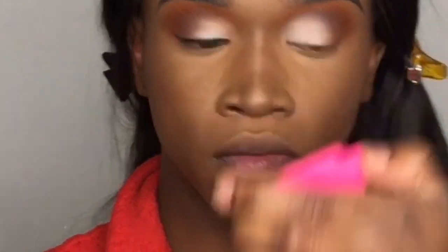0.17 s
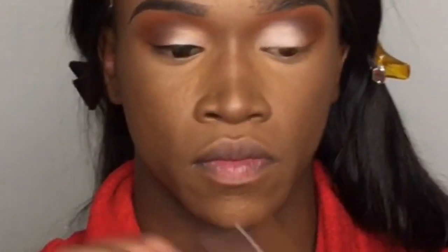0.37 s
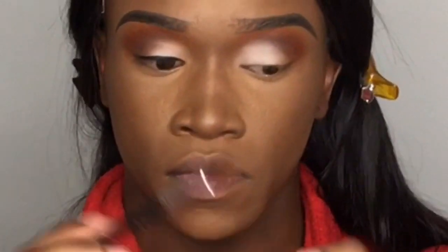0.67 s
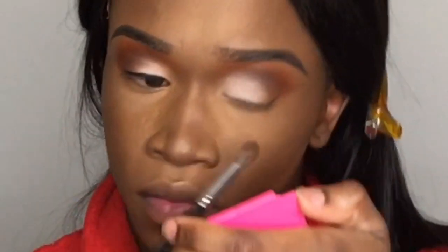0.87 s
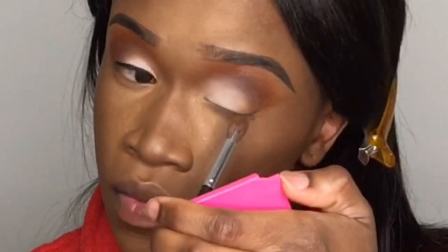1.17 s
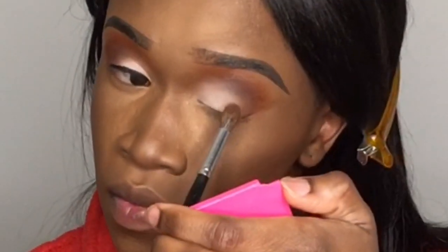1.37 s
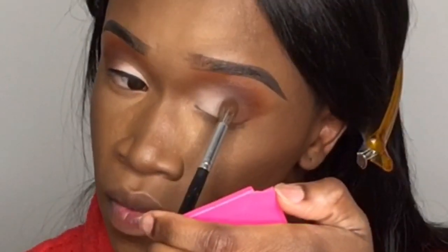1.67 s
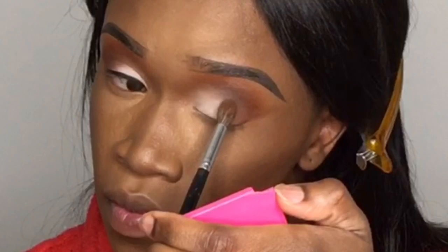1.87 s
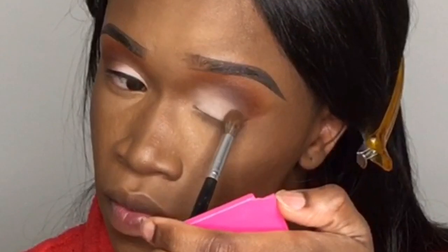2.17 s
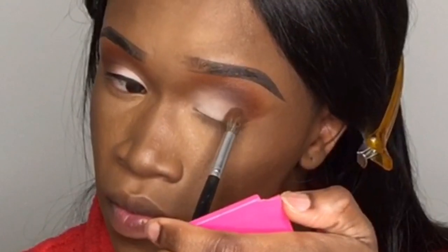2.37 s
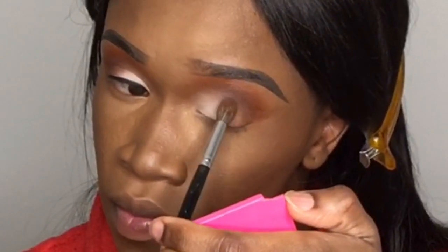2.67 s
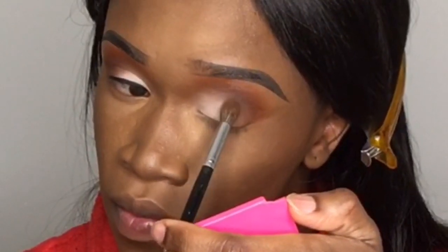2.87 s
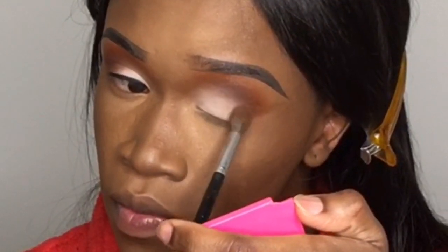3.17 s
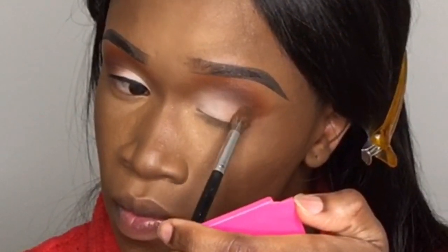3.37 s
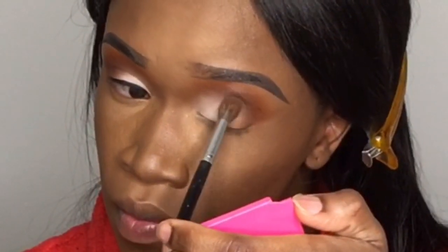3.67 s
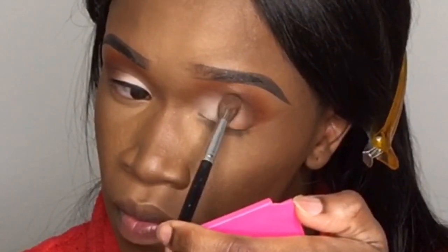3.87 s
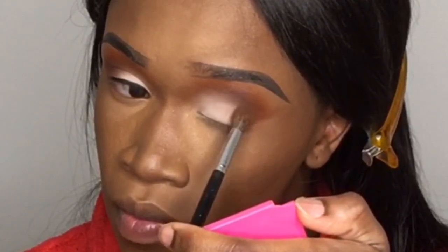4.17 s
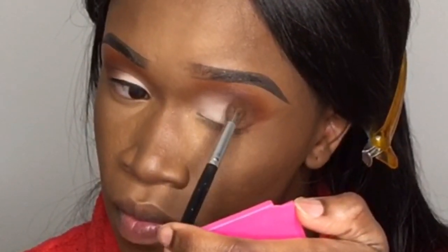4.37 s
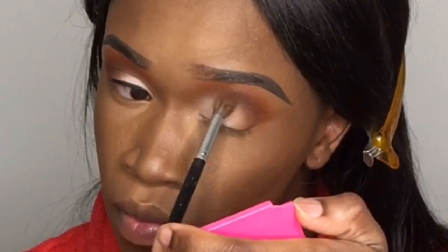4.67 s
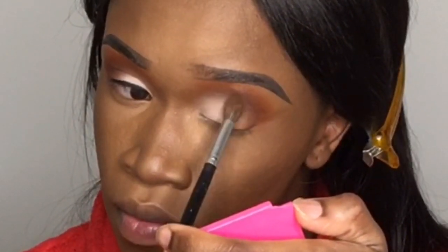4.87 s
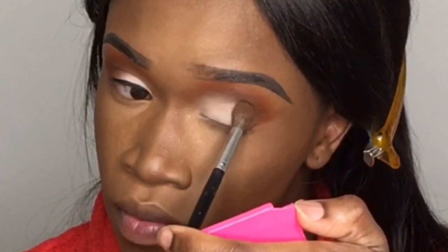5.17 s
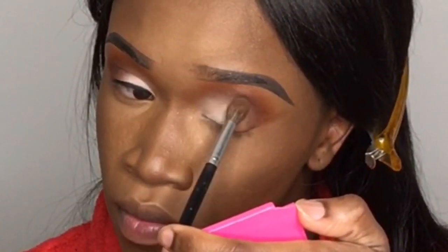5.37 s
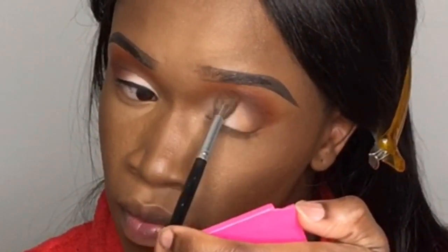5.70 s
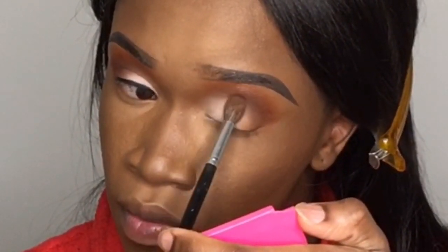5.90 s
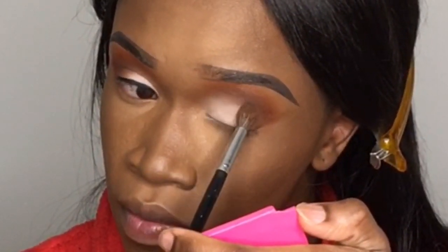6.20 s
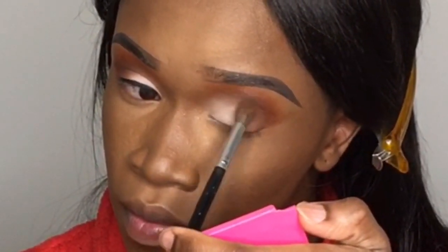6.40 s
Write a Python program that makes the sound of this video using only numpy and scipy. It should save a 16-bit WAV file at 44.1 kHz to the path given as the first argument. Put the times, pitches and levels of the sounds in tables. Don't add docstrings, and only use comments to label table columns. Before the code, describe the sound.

Low, unsteady traffic rumble and a far engine drone lie under faint preamplifier hiss and barely audible fast motor ticking. Before half a second, then again just after, a hard plastic case is struck close by: two crisp, overloud clacks whose ring dies quickly in the small room. Soft, muffled low thumps follow, roughly one per second, while the engine fades and a faint fan hum slowly swells.

```python
import sys
import numpy as np
from scipy import signal
from scipy.fft import rfft, irfft
from scipy.io import wavfile

SR = 44100
rng = np.random.default_rng(int(sys.argv[2]) if len(sys.argv) > 2 else 0)


def magnitude_from_level(level_db):
    exponent = np.asarray(level_db, float) / 20
    return 10 ** exponent


def to_wav(sig):
    pcm = np.clip(np.atleast_2d(sig), -1, 1) * 32767
    pcm = np.round(pcm).astype(np.int16)
    wavfile.write(sys.argv[1], SR, pcm.T)


N = 288414


def rms_one(x):
    return x / np.sqrt(np.mean(x ** 2) + 1e-20)


def at_hz(points, hz):
    points_hz, values = np.array(points).T
    return np.interp(np.log(hz), np.log(points_hz), values)


def drift(rate):
    decimation = 40
    r = np.exp(-2 * np.pi * rate * decimation / SR)
    noise = rng.standard_normal(N // decimation + 2002)
    slow = signal.lfilter([1], [1, -2 * r, r * r], noise)[2000:]
    return np.interp(np.arange(N) / decimation, np.arange(len(slow)), rms_one(slow))


def ring(clicks, hz, t60):
    r = magnitude_from_level(-60 / (t60 * SR))
    w = 2 * np.pi * hz / SR
    return signal.lfilter([0, np.sin(w)], [1, -2 * r * np.cos(w), r * r], clicks + 1e-18)


def coloured(spectrum, size):
    hz = np.maximum(np.fft.rfftfreq(size, 1 / SR), 1)
    first_hz, last_hz = spectrum[0][0], spectrum[-1][0]
    inside = (hz > first_hz) & ((hz < last_hz) | (last_hz > SR / 3))
    white = rfft(rng.standard_normal(size))
    return rms_one(irfft(white * magnitude_from_level(at_hz(spectrum, hz)) * inside, size))


def bands(x, low_hz, count):
    spectrum = rfft(x)
    hz = np.maximum(np.fft.rfftfreq(len(x), 1 / SR), 1)
    half_octaves = 2 * np.log2(hz / low_hz)
    for k in range(count):
        weight = np.clip(1 - abs(half_octaves - k), 0, 1)
        yield low_hz * 2 ** (k / 2), irfft(spectrum * weight, len(x))


def rumble():
    # frequency in Hz, density in dB per Hz.
    rumble_spectrum = [(13, -54), (25, -25), (42, -7), (52, -4), (62, 3.5), (72, -1), (83, 1.5), (98, -5),
                       (135, -3), (172, -8), (204, -7), (229, -13.5), (309, -13.5), (529, -24.5),
                       (1200, -41.5)]
    town_db, town_tilt_db = -44, 0.79
    lorry_start_db, lorry_fade_db_per_s, lorry_tilt_db = -42.5, 2.5, 1.5
    lorry_db = lorry_start_db - lorry_fade_db_per_s * np.arange(N) / SR
    out = np.zeros(N)
    for hz, band in bands(coloured(rumble_spectrum, size=N), low_hz=25.0, count=12):
        octaves = np.log2(hz / 100)
        town = magnitude_from_level(town_db + town_tilt_db * octaves)
        lorry = magnitude_from_level(lorry_db + lorry_tilt_db * octaves)
        out += band * magnitude_from_level(1.38 * drift(2.3)) * np.hypot(town, lorry)
    return out


def drone(hz, swells, idle_db, wobble_hz, flutter_db):
    t = np.arange(N) / SR
    level_db = idle_db
    for s, top_db, rise_db, fall_db in swells:
        below_top_db = np.maximum(rise_db * (s - t), fall_db * (t - s))
        level_db = np.maximum(level_db, top_db - below_top_db)
    phase = 2 * np.pi * np.cumsum(hz + wobble_hz * drift(13.0)) / SR
    return np.sqrt(2) * magnitude_from_level(level_db + flutter_db * drift(5.1)) * np.sin(phase)


def engine():
    # time of the top in s, level in dB, rise in dB per s, fall in dB per s.
    low_swells = [
        (.3, -40.5, 8, 11),
        (2.03, -38, 10.5, 18),
    ]
    high_swells = [
        (.0, -41, 30, 35),
        (.45, -38.5, 28, 53),
        (.87, -44, 18, 12.6),
        (1.5, -47, 6.8, 30),
        (2.2, -52.5, 8, 9),
    ]
    sag_start_s, sag_end_s, sag_hz_per_s, recover_hz_per_s = .55, 1.7, 13, 45.5
    t = np.arange(N) / SR
    slowing = sag_hz_per_s * (t - sag_start_s)
    recovering = sag_hz_per_s * (sag_end_s - sag_start_s) - recover_hz_per_s * (t - sag_end_s)
    sag_hz = np.maximum(np.minimum(slowing, recovering), 0)
    low = drone(145.9, low_swells, idle_db=-53.5, wobble_hz=0.97, flutter_db=0.8)
    high = drone(204 - sag_hz, high_swells, idle_db=-73, wobble_hz=3.01, flutter_db=2.5)
    return low + high


def fan():
    # time of the top in s, level in dB, rise in dB per s, fall in dB per s.
    fan_swells = [
        (3.6, -47, 2.5, 16),
    ]
    return drone(61, fan_swells, idle_db=-61, wobble_hz=1.5, flutter_db=2.5)


def hiss():
    # frequency in Hz, density in dB per Hz.
    hiss_spectrum = [(290, -28), (500, -4), (667, -2.5), (816, -4), (3810, -11), (4860, -11.5),
                     (6300, -12.5), (7710, -15), (9560, -13.5), (10400, -14.5), (15600, -19.5)]
    # frequency in Hz, width in Hz, depth from 0 to 1.
    dips = [(4900, 430, 0.41), (10360, 610, 0.54), (7500, 600, 0.14)]
    hiss_db, top_hz = -51, 15730
    hz = np.fft.rfftfreq(N, 1 / SR)
    shape = 1
    for dip_hz, width_hz, depth in dips:
        shape = shape * (1 - np.clip(depth, 0, 1) / (1 + (2 * (hz - dip_hz) / width_hz) ** 2))
    return magnitude_from_level(hiss_db) * irfft(rfft(coloured(hiss_spectrum, size=N)) * shape * (hz < top_hz), N)


def lens_motor():
    # frequency in Hz, level in dB, t60 in s.
    lens_modes = [(2600, -20.5, .004), (6360, -2.5, .006), (7230, -3, .004), (8500, -7.5, .003),
                  (9720, -4, .007), (12550, -8, .003)]
    # delay in s, level in dB, chance from 0 to 1.
    after_ticks = [(.0035, -3, .4), (.0165, -13, .4)]
    tick_start_s, tick_period_s, tick_db = .0236, .05, -42
    clicks = np.zeros(N + SR)
    starts = np.arange(tick_start_s, N / SR, tick_period_s)
    draws = rng.random((len(starts), 6))
    second = np.arange(len(starts)) % 2
    jittered = starts + .0003 * draws[:, 5]
    clicks[(jittered * SR).astype(int)] = magnitude_from_level(2.5 * (draws[:, 0] - .5) + .8 * second)
    for k, (delay, db, chance) in enumerate(after_ticks):
        late = starts + delay + 0.0015 * (draws[:, 1 + k] - .5)
        happens = draws[:, 3 + k] < chance * (.3 + .7 * second)
        clicks[(late * SR).astype(int)] = magnitude_from_level(db) * happens
    out = np.zeros(N)
    for k, (hz, db, t60) in enumerate(lens_modes):
        out += magnitude_from_level(db) * ring(clicks[:N], hz, t60) * (-1) ** k
    return magnitude_from_level(tick_db) * out


def thuds():
    # start in s, peak in dB, wall frequency in Hz, hollow knock in dB, puff in dB.
    blows = [
        (.12, -44, 132, -65, -49),
        (1.47, -28, 127, -55, -55.5),
        (2.38, -31.5, 130, -52, -51),
        (2.49, -32.5, 138.6, -58, -65),
        (3.41, -32.5, 132, -52.5, -50.5),
        (4.38, -32, 132, -55, -55),
        (5.42, -30.5, 140.5, -52.5, -54),
        (6.44, -39, 130, -53.5, -56.5),
    ]
    out = np.zeros(N + SR)
    t = np.arange(SR // 2) / SR
    envelope = (1 - np.exp(-t / 0.0088)) * magnitude_from_level(-60 * t / 0.78)
    for s, peak_db, hz, knock_db, puff_db in blows:
        low = np.sin(2 * np.pi * hz * t) * magnitude_from_level(peak_db) * np.exp(-((t - .03) / 0.013) ** 2)
        noise = rng.standard_normal(len(t))
        hollow = magnitude_from_level(knock_db) * rms_one(ring(noise, 666, 0.062))
        puff = magnitude_from_level(puff_db) * (rms_one(ring(noise, 359, 0.046)) + rms_one(ring(noise, 1150, 0.00094)))
        out[round(s * SR):][:len(t)] += low + (hollow + puff) * envelope
    return out[:N]


def tap(which, peak_db, crack_db, tilt_db, tail_db):
    # frequency in Hz, first tap in dB, second tap in dB, t60 in s.
    case_modes = [(267, -56, -30, .05), (455, -22, -24, 0.058), (595, -24, -33, 0.072),
                  (724, -44, -26, 0.084), (1125, -16.5, -12.5, 0.022), (1740, -3.5, -5.5, 0.015),
                  (2090, -1.5, -4.5, 0.01), (2855, 0.5, 0, 0.0096), (3230, -1, -3.5, 0.012),
                  (3620, 1, -1.5, 0.016), (4450, -8.5, -4.5, 0.012), (5790, -10.5, -13, 0.01),
                  (6566, -7, -7.5, 0.018), (9170, -0.5, -2, 0.0059)]
    long_rings = [(1145, -25, -19, 0.36), (1620, -17, -14, 0.24), (1846, -8, -12, 0.18),
                  (2003, 1, -9, 0.13), (2128, -2, -2, 0.2), (2275, -4, -8, 0.3), (2570, -26, -9, 0.22),
                  (2830, 1, -20, 0.076), (3137, -14, -13, 0.23), (3580, 1, -18, 0.12),
                  (4000, -16, -8, 0.22), (4240, -16, -12, 0.3), (4415, -16, -16, 0.25),
                  (4940, -3, -26, 0.15)]
    # delay in s, level of the body in dB, level of the crack in dB.
    echoes = [(.0022, -13.5, -12), (.0066, -13, -15), (.0078, -5.5, -4.5), (.0105, -7.5, -12),
              (0.0156, -17, -18)]
    # frequency in Hz, density in dB per Hz.
    tail_spectrum = [(180, -46), (300, -38), (622, -26), (734, -19.5), (824, -25), (1130, -13), (1230, -18),
                     (1420, -15), (1680, -19), (2080, -4), (2460, -9.5), (3720, -13.5), (5260, -13.5),
                     (6310, -13.5), (15700, -24.5)]
    # frequency in Hz, t60 in s.
    tail_t60 = [(300, 0.4), (790, 0.26), (2090, 0.29), (5510, 0.3), (14600, 0.17)]
    t = np.arange(SR // 2) / SR
    contact = (t == 0) + 0.62 * (abs(t - .0007) < .5 / SR) + 0.36 * (abs(t - .0016) < .5 / SR)
    modes = np.zeros(len(t))
    for k, (hz, *db, t60) in enumerate(case_modes):
        modes += magnitude_from_level(db[which]) * ring(contact, hz, t60) * (-1) ** k
    crack = np.diff(rng.standard_normal(len(t) + 1)) * magnitude_from_level(crack_db - 60 * t / 0.0072)
    heard = modes / 2.33 + crack
    for delay, body_db, edge_db in echoes:
        echo = magnitude_from_level(body_db) * modes / 3.0 + magnitude_from_level(edge_db) * crack
        heard = heard - np.roll(echo, round(delay * SR))
    tail = np.zeros(len(t))
    for hz, band in bands(coloured(tail_spectrum, size=len(t)), low_hz=281, count=13):
        t60 = 1.113 * at_hz(tail_t60, hz)
        tail += band * magnitude_from_level(tilt_db * np.log2(hz / 3000) - 60 * t / t60)
    rings = np.zeros(len(t))
    for hz, *db, t60 in long_rings:
        level_db = db[which] - 60 * t / t60 + 3.3 * drift(28.0)[:len(t)]
        rings += np.sin(2 * np.pi * (hz * t + rng.random())) * magnitude_from_level(level_db)
    build_up = 1 - np.exp(-t / 0.0031)
    ring_build_up = 1 - np.exp(-(t / 0.016) ** 2)
    return magnitude_from_level(peak_db) * (heard + magnitude_from_level(tail_db) * (build_up * tail + ring_build_up * rings))


def taps():
    # start in s, peak in dB, crack in dB, tilt of the tail in dB per octave, tail in dB.
    blows = [
        (.4274, 5, -11.5, -0.5, -15.5),
        (.5643, 5, -10, -1.25, -17),
    ]
    out = np.zeros(N)
    for which, (s, *how) in enumerate(blows):
        out[round(s * SR):][:SR // 2] += tap(which, *how)
    return out


def scene():
    outside = rumble() + engine()
    inside = fan() + hiss() + lens_motor() + thuds() + taps()
    return (outside + inside)[None]


def roll_off(x):
    return signal.sosfilt(signal.butter(12, 15730, fs=SR, output="sos"), x)


def record(dry):
    low_pass = signal.ellip(10, .2, 60, 15900, fs=SR, output="sos")
    return roll_off(signal.sosfilt(low_pass, np.clip(dry, -1, 1)))


dry = scene()
out = record(dry)
to_wav(out)
```